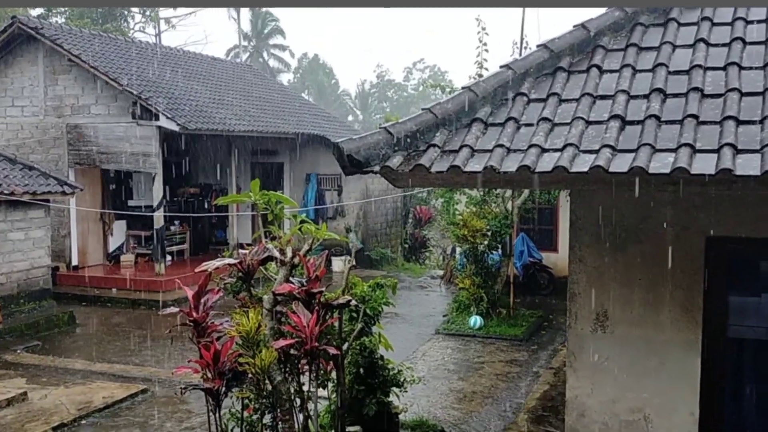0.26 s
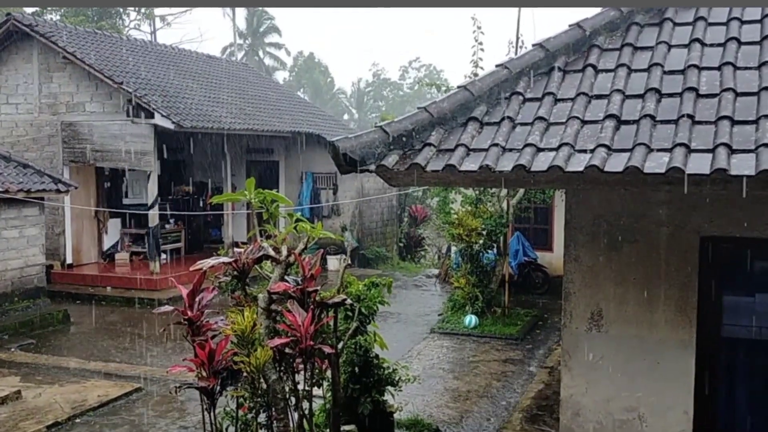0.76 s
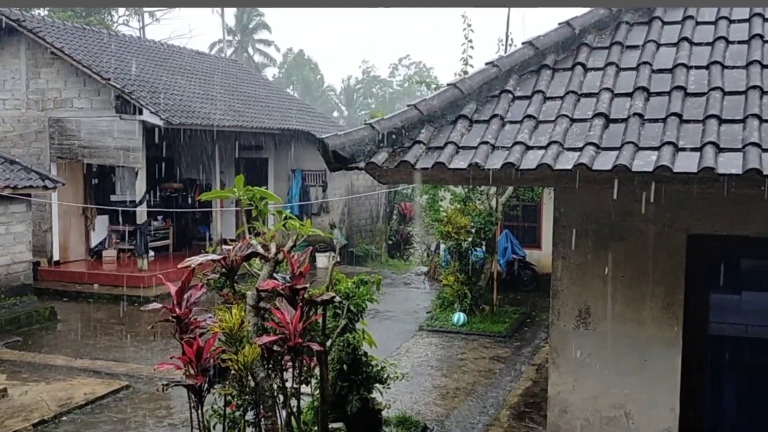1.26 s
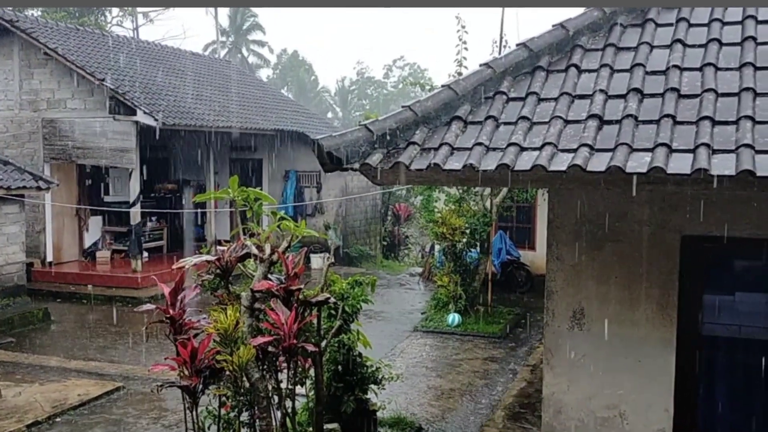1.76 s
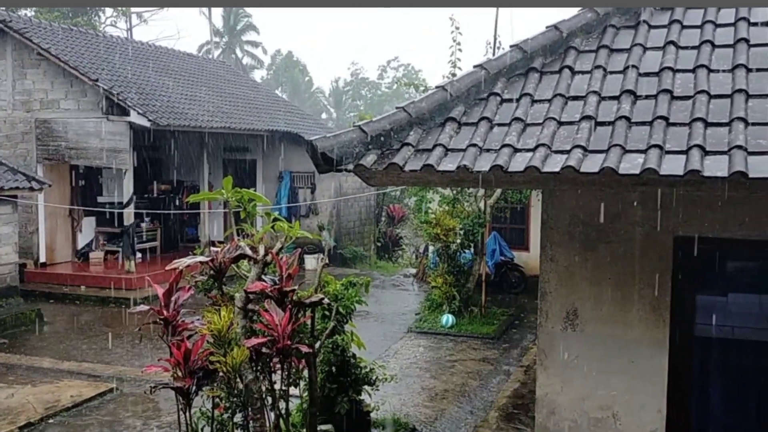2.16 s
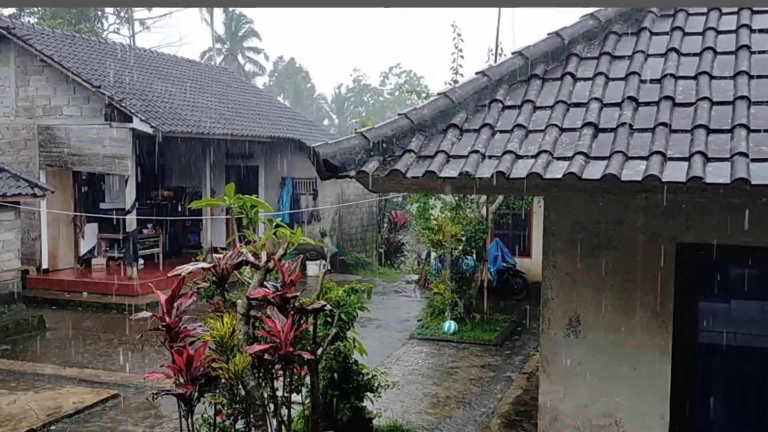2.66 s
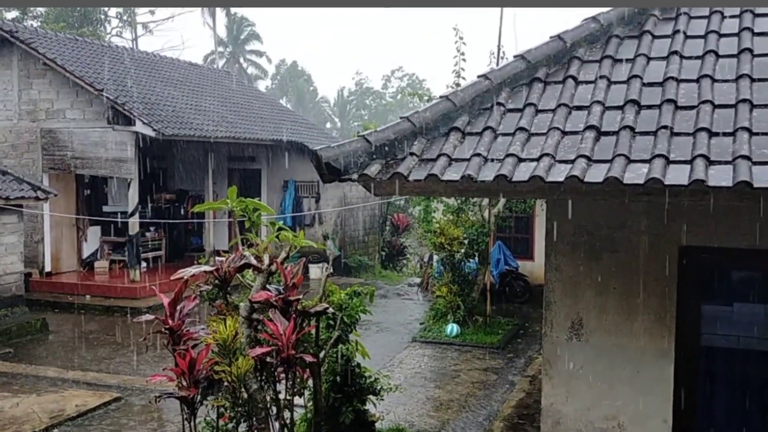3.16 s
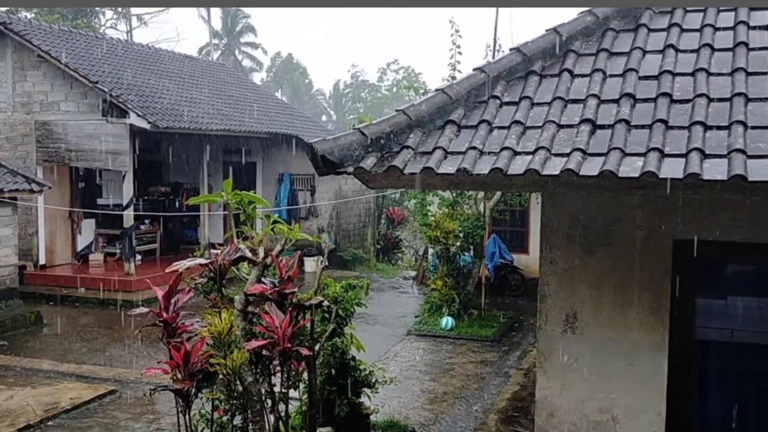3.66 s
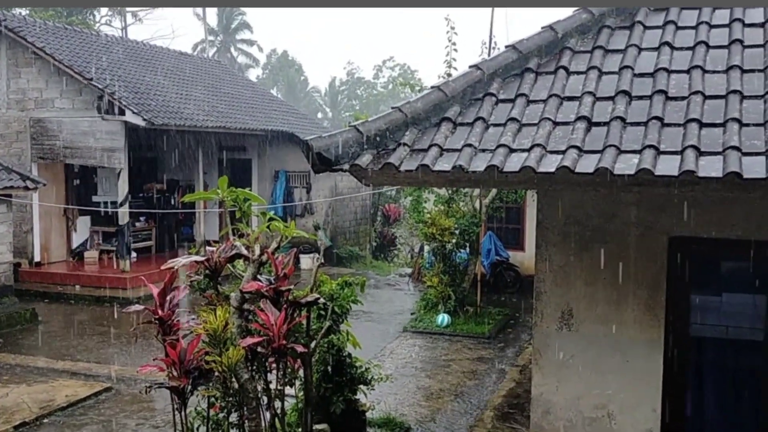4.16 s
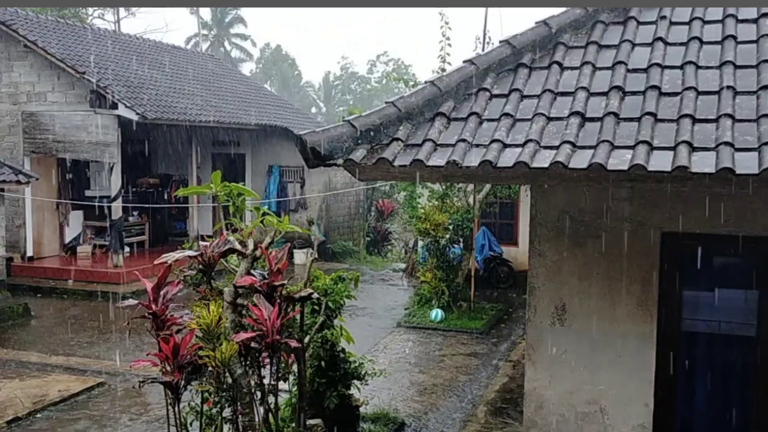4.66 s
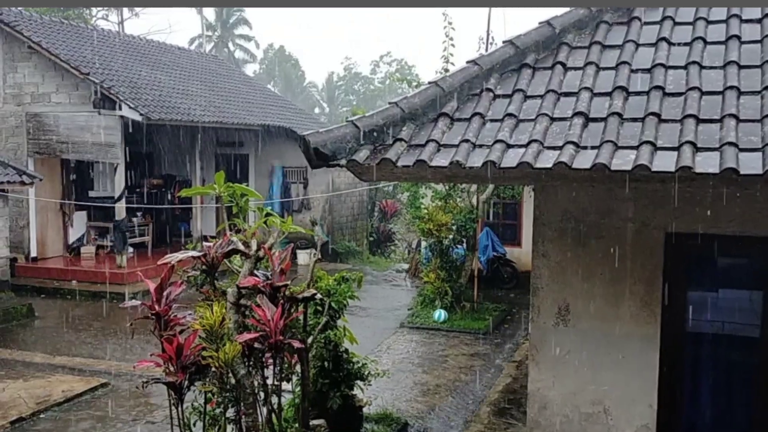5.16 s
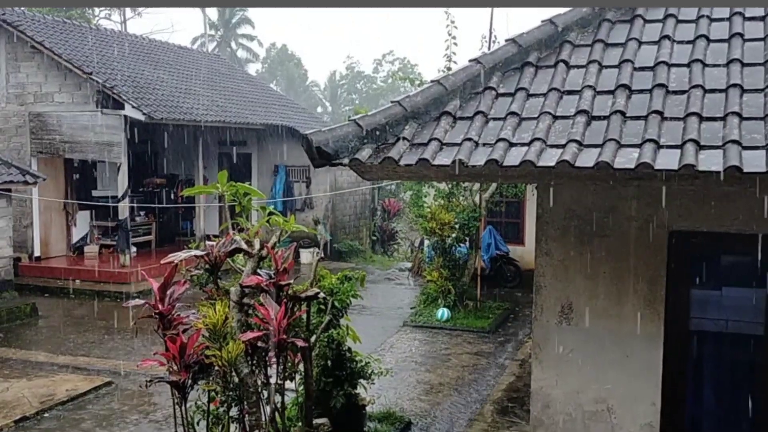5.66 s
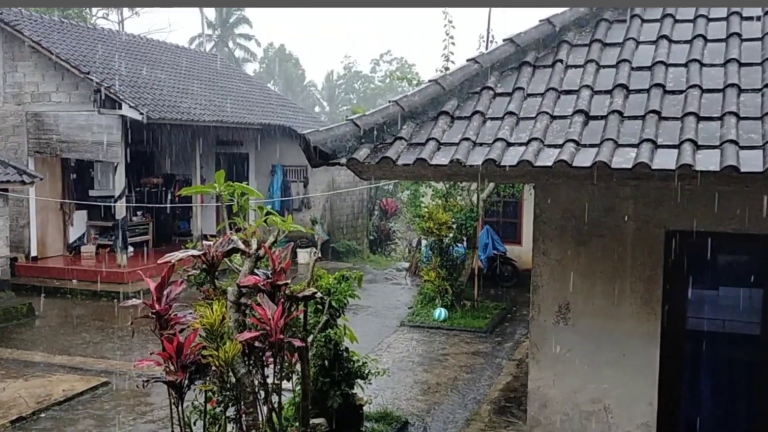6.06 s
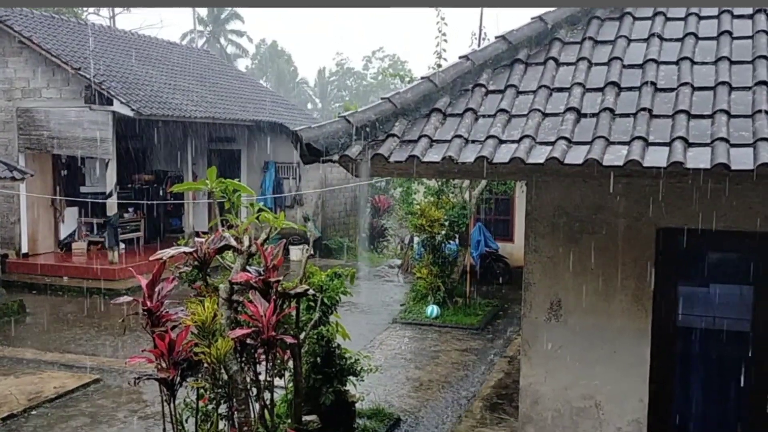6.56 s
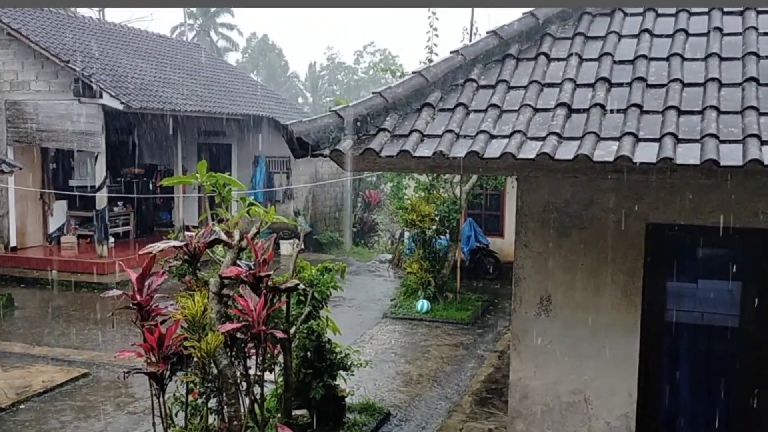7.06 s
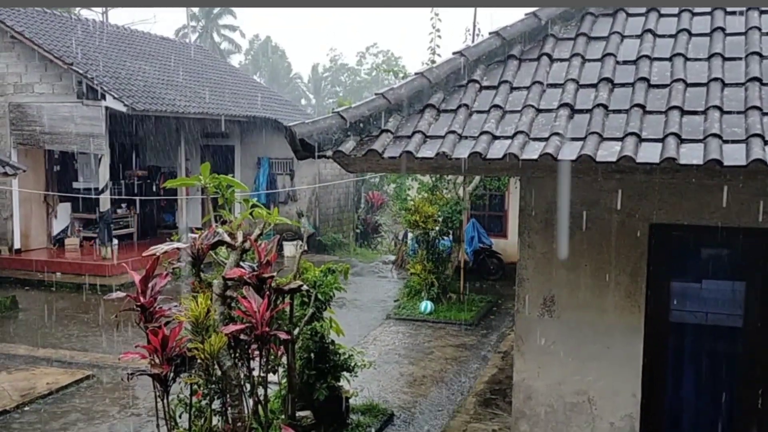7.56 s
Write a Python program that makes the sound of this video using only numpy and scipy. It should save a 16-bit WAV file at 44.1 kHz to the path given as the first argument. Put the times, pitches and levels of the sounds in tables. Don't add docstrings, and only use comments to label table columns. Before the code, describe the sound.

Heavy rain pours steadily on tiled roofs and wet concrete, with sharp close drips and splats from the eave and faint low thunder.

```python
import sys
import numpy as np
from scipy import signal
from scipy.io import wavfile
from scipy.ndimage import uniform_filter1d

SR = 44100
rng = np.random.default_rng(int(sys.argv[2]) if len(sys.argv) > 2 else 0)


def persist_wave(psi):
    counts = np.round(np.clip(psi, -1, 1) * 32767).astype(np.int16)
    wavfile.write(sys.argv[1], SR, np.atleast_2d(counts).T)


def natural_amplitude(level_db):
    exponent = np.asarray(level_db, float) / 20
    return 10 ** exponent


N = 344421

# time_s, level_db
DOWNPOUR = [(0, -15), (0.25, -15.5), (0.5, -16), (0.7, -15), (1.0, -16.5), (1.63, -16.5), (1.85, -18.5),
            (2.45, -18.5), (2.85, -18), (3.0, -17), (3.6, -17), (3.93, -16), (4.15, -16.5), (5.4, -16.5),
            (6.1, -17.6), (6.75, -17.5), (7.1, -16.6), (7.81, -16.5)]
# pitch_hz, level_db (per Hz)
PATTER_COLOUR = [(190, -9.5), (326, -7.5), (418, -14), (461, -11), (698, -7), (871, -7.5), (1270, -3),
                 (1770, -1), (2300, -2), (2900, -5.5), (3600, -9.5), (4300, -15.5), (5200, -25.5),
                 (6500, -40)]
# pitch_hz, level_db (per Hz)
SPRAY_COLOUR = [(2470, -38), (4200, -9.5), (5860, -4), (7160, -2), (8370, 0), (9400, -4.5), (10500, -3),
                (13600, -34), (22000, -120)]
# pitch_hz, level_db (per Hz)
MIST_COLOUR = [(5290, -36), (9000, -6), (11100, -1.5), (13100, -0.5), (14900, -1), (15400, -9.5)]
SPRAY_BELOW_DB, MIST_BELOW_DB = 11, 10.5
SPRAY_FOLLOWS, MIST_FOLLOWS = 0.92, 1.05

# crest_s, spray_lift_db, mist_lift_db
GUSHES = [(0.0, 2, -1), (0.235, 4, 1), (0.66, 3.5, 3), (0.92, 1, 2), (1.19, 1.5, 1), (1.44, 4.5, 5),
          (1.53, 3.5, 3), (1.65, 1, 3), (1.92, 1.5, 2.5), (2.245, 4, 0), (2.39, -0.5, 1.5), (2.51, 2.5, 1),
          (2.91, 1, 1), (3.04, 0, 1), (3.32, 1.5, 2), (3.515, 3.5, 3), (3.76, 1, 1), (3.92, 0, 1.5),
          (4.43, 2, 3), (4.73, 1.5, 1), (4.99, 1.5, 1.5), (5.43, 1.5, 3), (5.76, 2, 6), (5.93, 2.5, 4),
          (6.02, 2, 3), (6.33, 0.5, 4), (6.515, 0.5, 4), (7.23, -1, 1), (7.45, 3, 1), (7.62, 1, 1.5)]
GUSH_RISE_S, GUSH_FALL_S = 0.024, 0.051
CRACKLE_PER_S, CRACKLE_DB, CRACKLE_SPREAD_DB = 36, -16, 4.0

# crest_s, rumble_db, growl_db
THUNDER = [(0.0, -25.5, -26), (0.4, -32, -33), (1.06, -26, -30), (1.33, -31, -31), (1.59, -30.5, -30.5),
           (2.18, -41, -36), (2.56, -39, -29.5), (2.85, -28, -35), (3.3, -44, -37), (3.62, -41, -41),
           (4.2, -40.5, -39), (4.75, -37, -43), (5.0, -42, -40), (5.42, -41, -38), (6.13, -53, -49),
           (6.81, -41, -47), (7.29, -32, -31)]
# pitch_hz, level_db (per Hz)
THUNDER_COLOUR = [(12, -33), (20, -3), (49, -1), (102, -8), (146, 4.5), (162, -11), (200, -9), (260, -40),
                  (440, -120)]
ROLL_RISE_DB_PER_S, RUMBLE_FALL_DB_PER_S, GROWL_FALL_DB_PER_S = 110, 25.5, 25
RUMBLE_FLOOR_DB, GROWL_FLOOR_DB = -40, -46

# start_s, peak_db, pitch_hz
KNOCKS = [(0.2307, -10, 1640), (0.3119, -2.5, 1450), (0.68, -5, 2050), (1.159, -16, 300),
          (1.6761, -4, 1810), (2.574, -5, 2030), (3.0378, 0, 1595), (3.047, -6, 1520), (3.8747, -6, 1620),
          (4.12, -6, 2300), (4.1383, 1, 1700), (4.165, -12, 1650), (5.3622, -7, 1690), (5.657, -6, 1500),
          (5.8764, -7, 2870), (6.957, -6, 1560), (7.04, -5, 1900), (7.5248, -4, 2120)]
# start_s, peak_db
SPLATS = [(0.3361, -5), (0.626, 7), (0.6444, -2), (0.8824, 0), (1.0889, 1), (1.222, 2), (1.4349, -7),
          (1.6221, -4), (1.724, 5), (2.0153, -7), (2.2453, 2), (3.029, 3), (3.3159, -5), (3.4974, -3),
          (3.5194, -1), (3.6586, -7), (3.7474, -1), (4.3509, -7), (4.413, 3), (5.4585, 4), (5.5588, -2),
          (5.677, -5), (5.7488, 3), (5.9209, -3), (6.1295, 2), (6.3269, -1), (6.5609, -3), (6.6009, 1),
          (7.2309, 1), (7.741, 0)]
# start_s, peak_db, centre_hz
TICKS = [(0.2309, -3, 4430), (0.416, -4, 8000), (0.9157, -2, 7000), (1.1796, -10, 7470),
         (1.2044, -10, 7040), (1.8382, -22, 7430), (2.2453, 0, 7900), (2.374, -8, 7450), (2.4853, -7, 4320),
         (2.6499, -5, 7750), (3.2709, -7, 8000), (3.3154, -13, 7830), (3.4979, -5, 7950), (3.927, 0, 4620),
         (4.2901, -5, 4720), (4.4134, -6, 7900), (4.6884, -9, 7940), (4.9731, -4, 7300), (5.0954, -6, 7630),
         (5.9198, -3, 6980), (6.0681, -12, 7710), (6.4078, -7, 6860), (6.521, -11, 7810),
         (7.0768, -6, 7940), (7.4359, -5, 6120), (7.5254, -7.5, 7770), (7.5956, -11, 7880),
         (7.6329, -10, 7980)]
# start_s, peak_db
DRIPS = [(0.7003, -4), (0.9374, -3), (1.1004, -8), (1.4849, -16), (1.514, -9), (1.9008, -7), (3.0539, -10),
         (3.3654, -3), (3.5014, -2), (3.5074, -2), (3.5134, -4), (3.5244, -4), (3.5304, -3), (3.5708, -5),
         (3.9183, -7), (3.9404, -5), (5.1162, -7), (5.1648, -15), (5.2125, -14), (5.4644, -6), (5.6994, -6),
         (5.7678, -3), (6.5188, -5), (7.3351, -7), (7.4358, -7), (7.6348, -6)]
SPLAT_TICK_LAG_S = 0.0008
SPLAT_T60_S, DRIP_T60_S, DRIP_DB = 0.014, 0.0065, -0.5
SNAP_DB, SNAP_LOW_HZ, SNAP_HIGH_HZ = -3, 3200, 17000

# start_s, peak_db
PINGS = [
    (0.4029, -30),
    (0.6649, -24),
    (0.925, -29),
    (0.9642, -29),
    (1.6197, -28),
    (3.0229, -28),
]
# pitch_hz, level_db, t60_s
RIM_MODES = [
    (5325, 0, .5),
    (5372, -11, .2),
    (9250, -8, .3),
]
# start_s, peak_db, pitch_hz
PLINKS = [
    (1.180, -21, 7140),
    (1.675, -26, 4500),
    (2.20, -25, 4350),
]

# start_s, end_s, depth_db
DUCKS = [(0.942, 1.046, -1.5), (1.216, 1.317, -1.5), (1.427, 1.536, -10.5), (4.347, 4.445, -4),
         (5.113, 5.164, -6), (5.159, 5.261, -12), (5.44, 5.66, -2), (5.754, 5.866, -2.5), (5.915, 6.01, -8),
         (6.324, 6.409, -5.5), (6.594, 6.697, -4.5)]
# pitch_hz, width_hz, level_db of the added part
MIC_PEAKS = [
    (8430, 930, -5),
    (15300, 1000, 5),
]
CUTOFF_HZ = 15520
SIDE_LOW_DB, SIDE_HIGH_DB, SIDE_STRAY_DB = -22, -25, -46


def rms_one(x):
    return x / np.sqrt(np.mean(x ** 2) + 1e-20)


def band(x, low_hz, high_hz):
    edges_hz = [low_hz, min(high_hz, .45 * SR)]
    return signal.sosfilt(signal.butter(2, edges_hz, "band", fs=SR, output="sos"), x)


def in_time(rows):
    time_s, *columns = np.transpose(rows)
    return [np.interp(np.arange(N) / SR, time_s, column) for column in columns]


def drift(rate_hz):
    r = np.exp(-80 * np.pi * rate_hz / SR)
    noise = rng.standard_normal(N // 40 + 2002)
    slow = signal.lfilter([1], [1, -2 * r, r * r], noise)[2000:]
    return np.interp(np.arange(N) / 40, np.arange(len(slow)), rms_one(slow))


def impacts(per_s, spread_db, t60, clump_db):
    born = rng.random(N) < per_s * natural_amplitude(clump_db * drift(8)) / SR
    sizes = natural_amplitude(2 * spread_db * np.minimum(rng.exponential(1, N), 4.5))
    power = signal.lfilter([1], [1, -natural_amplitude(-120 / (t60 * SR))], born * sizes + 1e-18)
    return power / power.mean()


def rainfall(colour, low_hz, high_hz, drops, near_share, patchy_db, count):
    hz, db = np.transpose(colour)
    edges = np.geomspace(low_hz, high_hz, count + 1)
    share = np.clip(near_share, 0, 1)
    white = rng.standard_normal((2, N)) * np.sqrt(1 - share + share * drops)
    out = np.zeros(N)
    for k, (low, high) in enumerate(zip(edges, edges[1:])):
        if k % 3 == 0:
            region = drift(21)
        centre_db = np.interp(np.log(low * high) / 2, np.log(hz), db)
        out += natural_amplitude(centre_db + patchy_db * region) * band(white[k % 2], low, high)
    return rms_one(out)


def gush_lift():
    t, lift = np.arange(N) / SR, 0
    for crest_s, *lift_db in GUSHES:
        width_s = np.where(t < crest_s, GUSH_RISE_S, GUSH_FALL_S)
        shape = np.exp(-((t - crest_s) / width_s) ** 2)
        lift = lift + np.outer(lift_db, shape)
    return lift


def crackle(lift_db):
    born = rng.random(N) < CRACKLE_PER_S * natural_amplitude(2.5 * lift_db) / SR
    sizes = natural_amplitude(CRACKLE_SPREAD_DB * np.minimum(rng.exponential(1, N), 3.5))
    clicks = born * sizes * rng.choice([-1, 1], N)
    dealt = rng.integers(0, 3, N)
    ranges = [(3300, 5700, 7.0), (5500, 12000, 2.0), (8000, 17000, -7.0)]      # low_hz, high_hz, level_db
    out = np.zeros(N)
    for k, (low, high, db) in enumerate(ranges):
        out += natural_amplitude(CRACKLE_DB + db) * band(clicks * (dealt == k) + 1e-18, low, high)
    return out


def rolls(column, fall_db_per_s, floor_db):
    t = np.arange(N) / SR
    power = natural_amplitude(2 * floor_db)
    for roll in THUNDER:
        age = t - roll[0]
        slope_db = np.minimum(ROLL_RISE_DB_PER_S * age, -fall_db_per_s * age)
        power = power + natural_amplitude(2 * (roll[column] + slope_db))
    return np.sqrt(power)


def ring(clicks, hz, t60):
    r, w = natural_amplitude(-60 / (t60 * SR)), 2 * np.pi * hz / SR
    return signal.lfilter([0, np.sin(w)], [1, -2 * r * np.cos(w), r * r], clicks + 1e-18)


def knocks():
    out, click = np.zeros(N + 2048), np.eye(1, 2048)[0]
    for start_s, db, hz in KNOCKS:
        modes = ring(click, hz, 0.049) + .5 * ring(click, .87 * hz, 0.044)
        out[round(start_s * SR):][:2048] += natural_amplitude(db - 7.5) * modes
    return out[:N]


def spit(low_hz, high_hz, t60, tail):
    age = np.arange(3072) / SR
    noise = rng.standard_normal(len(age))
    noise[0] = 10
    decay = natural_amplitude(-60 * age / max(t60, .002)) + tail * natural_amplitude(-60 * age / 0.2)
    burst = band(noise * decay, low_hz, high_hz)
    return burst / np.abs(burst).max()


def splats():
    out = np.zeros(N + 3072)
    for start_s, db in DRIPS:
        drip = spit(6300, 21000, DRIP_T60_S, tail=0.08)
        out[round(start_s * SR):][:3072] += natural_amplitude(db + DRIP_DB) * drip
    for start_s, db in SPLATS:
        splat = spit(9400, 21000, SPLAT_T60_S, tail=0.14)
        out[round((start_s + SPLAT_TICK_LAG_S) * SR):][:3072] += natural_amplitude(db - 3.0) * splat
    for start_s, db, hz in TICKS:
        body = spit(0.83 * hz, 1.1 * hz, 0.03, tail=0.18)
        contact = 1.3 * spit(3200, 9000, 0.0046, tail=.05)
        out[round((start_s + SPLAT_TICK_LAG_S) * SR):][:3072] += natural_amplitude(db - 9.5) * (body + contact)
    return out[:N]


def snaps():
    clicks = np.zeros(N)
    for start_s, db, *_ in SPLATS + TICKS:
        height = natural_amplitude(min(db, -1) + SNAP_DB)
        clicks[round((start_s + SPLAT_TICK_LAG_S) * SR)] = height * rng.choice([-1, 1])
    return band(clicks + 1e-18, SNAP_LOW_HZ, SNAP_HIGH_HZ)


def pings():
    out, age = np.zeros(N + 4096), np.arange(4096) / SR
    swell = (1 - np.exp(-age / 0.0066)) / (1 + (age / 0.03) ** 4)
    for start_s, db in PINGS:
        for hz, mode_db, t60 in RIM_MODES:
            decay = natural_amplitude(db + mode_db - 60 * age / t60)
            out[round(start_s * SR):][:4096] += decay * swell * np.sin(2 * np.pi * hz * age)
    return out[:N]


def limiter_gain():
    db = np.zeros(N)
    for start_s, end_s, depth_db in DUCKS:
        db[round(start_s * SR):round(end_s * SR)] = depth_db
    slope = 2500 / SR * np.arange(N)
    db = np.minimum.accumulate(db - slope) + slope
    return natural_amplitude(uniform_filter1d(db, size=40))


def plinks():
    out, click = np.zeros(N + 2048), np.eye(1, 2048)[0]
    for start_s, db, hz in PLINKS:
        out[round(start_s * SR):][:2048] += natural_amplitude(db) * ring(click, hz, 0.13)
    return out[:N]


def scene():
    rain_db, = in_time(DOWNPOUR)
    mean_db = rain_db.mean()
    swing_db = rain_db - mean_db
    spray_lift_db, mist_lift_db = gush_lift()
    spray_db = mean_db - SPRAY_BELOW_DB + SPRAY_FOLLOWS * swing_db + spray_lift_db
    mist_db = mean_db - MIST_BELOW_DB + MIST_FOLLOWS * swing_db + mist_lift_db

    droplets = impacts(400, 3.8, 0.015, clump_db=4.0)
    finest = impacts(380, 5.3, 0.0096, clump_db=2.0)
    tile_drops = impacts(900, 3.3, 0.0054, clump_db=1.5)
    mist_drops = .4 * droplets + 0.55 * finest
    patter = rainfall(PATTER_COLOUR, 169.8, 6010, tile_drops, near_share=0.2, patchy_db=0.69, count=28)
    spray = rainfall(SPRAY_COLOUR, 4304, 10450, droplets, near_share=0.21, patchy_db=1.0, count=9)
    mist = rainfall(MIST_COLOUR, 9880, 16800, mist_drops, near_share=0.3, patchy_db=-0.5, count=6)
    bed = natural_amplitude(rain_db - 1.0) * patter + natural_amplitude(spray_db) * spray + natural_amplitude(mist_db) * mist

    rumble = rainfall(THUNDER_COLOUR, 79.4, 229.2, 1, near_share=0, patchy_db=1.5, count=6)
    growl = rainfall(THUNDER_COLOUR, 14, 91.5, 1, near_share=0, patchy_db=1.0, count=5)
    bed += rolls(1, RUMBLE_FALL_DB_PER_S, RUMBLE_FLOOR_DB) * rumble
    bed += rolls(2, GROWL_FALL_DB_PER_S, GROWL_FLOOR_DB) * growl

    near = splats() + snaps() + knocks() + pings() + plinks()
    return np.tile(limiter_gain() * (bed + crackle(spray_lift_db)) + near, (2, 1))


def roll_off(x):
    return signal.sosfilt(signal.butter(12, 16860, fs=SR, output="sos"), x)


def record(dry):
    x = dry
    for hz, width_hz, db in MIC_PEAKS:
        r = np.exp(-np.pi * width_hz / SR)
        poles = [1, -2 * r * np.cos(2 * np.pi * hz / SR), r * r]
        peak = signal.lfilter([(1 - r * r) / 2, 0, (r * r - 1) / 2], poles, x)
        x = x + natural_amplitude(db) * peak
    bass = signal.sosfilt(signal.butter(1, 500, fs=SR, output="sos"), x)
    stray = np.roll(x, round(.05 * SR), axis=1)
    side = natural_amplitude(SIDE_LOW_DB) * bass + natural_amplitude(SIDE_HIGH_DB) * (x - bass) + natural_amplitude(SIDE_STRAY_DB) * stray
    x = 2.168 * np.tanh((x + side * [[-1], [1]]) / 1.827)
    x = signal.sosfilt(signal.ellip(14, .3, 90, CUTOFF_HZ, fs=SR, output="sos"), x)
    return roll_off(x)


dry = scene()
out = record(dry)
persist_wave(out)
```